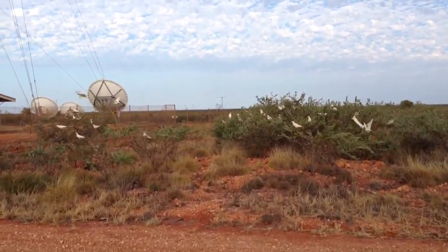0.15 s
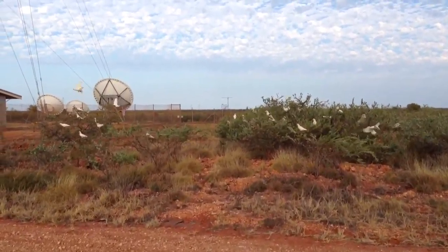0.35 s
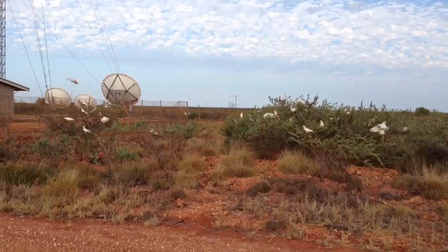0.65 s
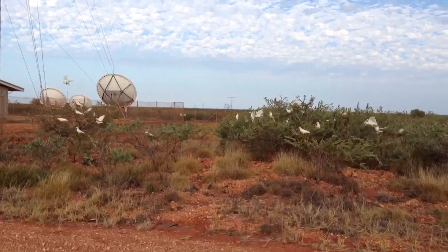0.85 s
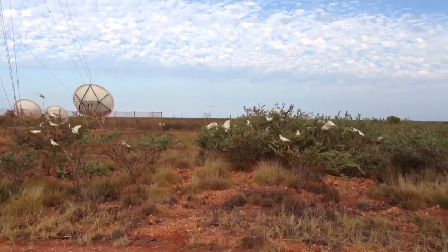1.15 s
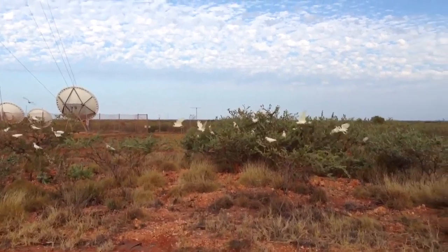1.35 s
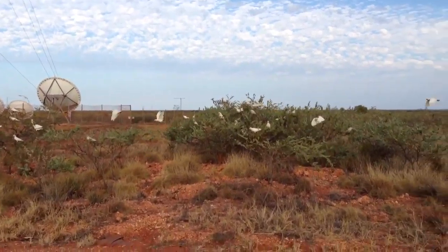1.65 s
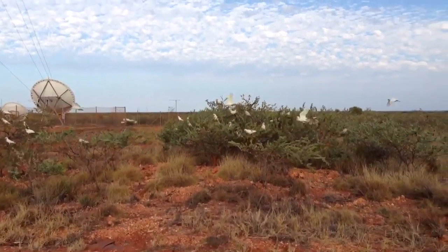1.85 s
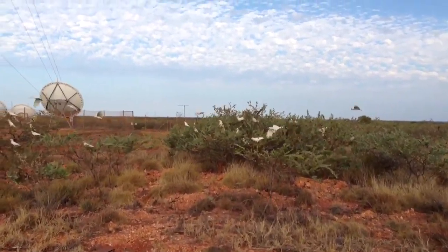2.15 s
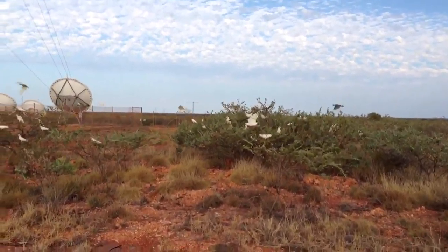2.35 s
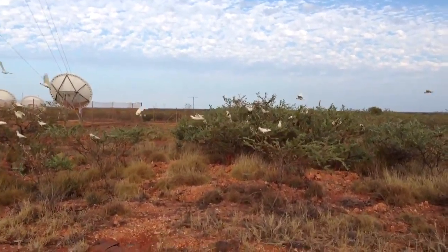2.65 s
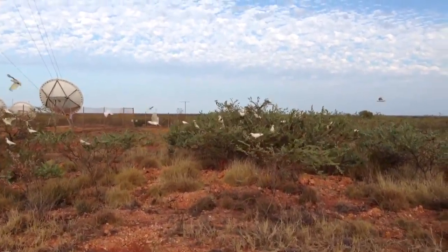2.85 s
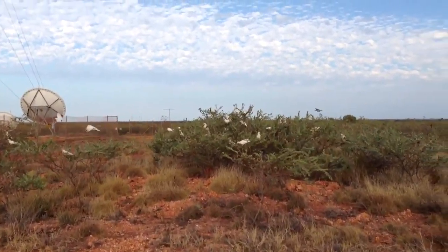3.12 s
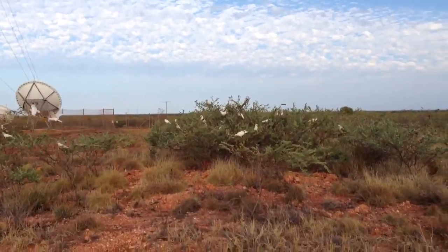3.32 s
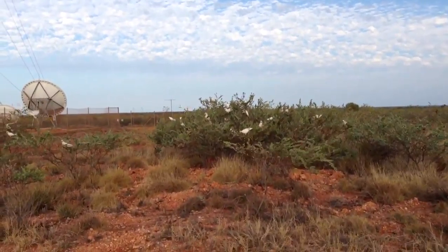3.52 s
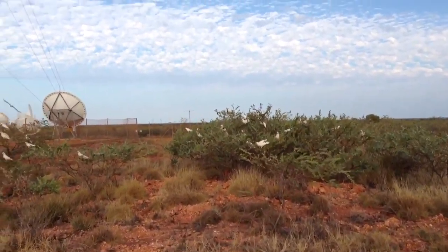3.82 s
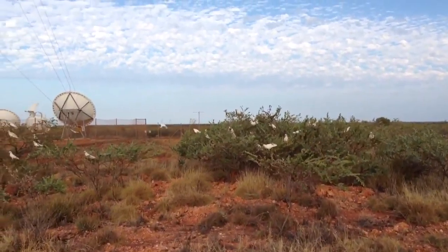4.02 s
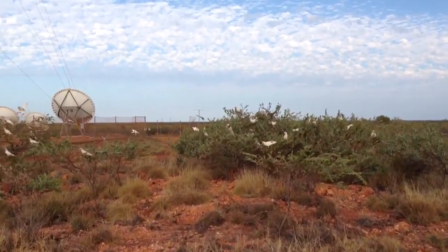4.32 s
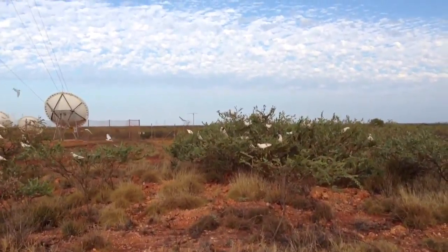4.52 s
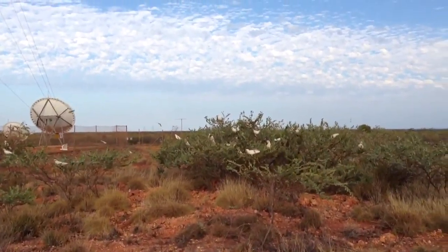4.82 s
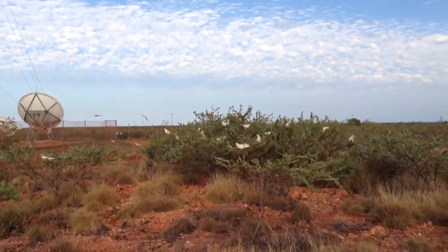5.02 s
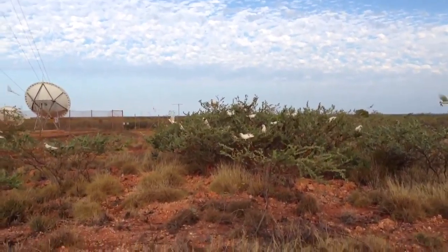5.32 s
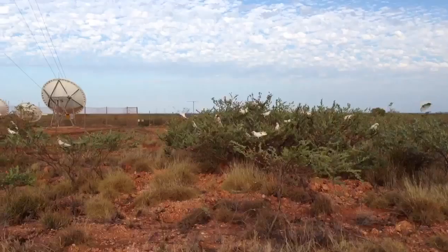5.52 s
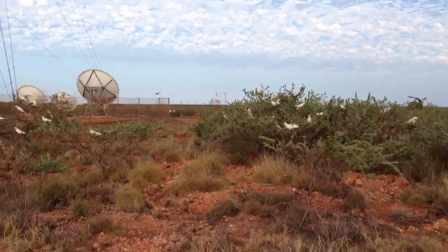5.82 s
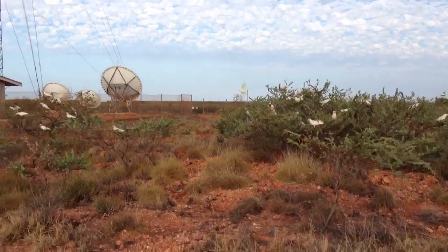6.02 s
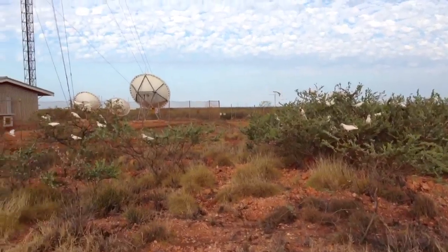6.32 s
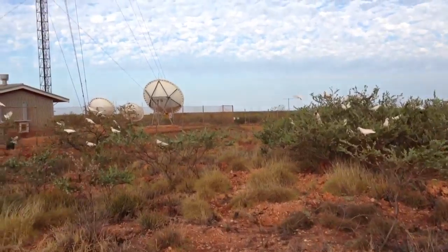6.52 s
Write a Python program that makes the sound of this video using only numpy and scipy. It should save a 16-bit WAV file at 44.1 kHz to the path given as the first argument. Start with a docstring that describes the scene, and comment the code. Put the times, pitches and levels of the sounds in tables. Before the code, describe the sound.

Outdoors in open, bushy scrubland, a flock of large parrots calls at varied distances. A wind bump hits the microphone early, then a strong hoarse squawk comes, followed by fainter calls and a lull. Louder wavering screeches return mid-way, the strongest around four seconds. Small dry ticks and a soft distant roar lie underneath. The end brings heavy low wind thumps with a few weaker calls.

```python
"""Open scrubland: a flock of large white parrots calls near and far, clear wavering screeches of arched notes.
Each call is a stack of harmonics hazed with breath noise; bushes, a building and far objects return it.
A gusty wind buffets the microphone with low noise and short puffs; small dry ticks are snaps of noise.
A distant roar and a deeper drone swell and fade over a faint hiss, all three made of noise bands."""
import sys
import numpy as np
from scipy import signal
from scipy.io import wavfile
from scipy.ndimage import uniform_filter1d, map_coordinates

SR = 44100
rng = np.random.default_rng(int(sys.argv[2]) if len(sys.argv) > 2 else 0)


def output_pcm(signal):
    """Save a mono or channel-first signal as 16-bit PCM at the path in sys.argv[1].

    Samples are clipped to [-1, 1] before scaling.
    """
    pcm = np.clip(np.atleast_2d(signal).T, -1, 1) * 32767
    wavfile.write(sys.argv[1], SR, np.round(pcm).astype(np.int16))


N = 293783   # samples
CUTOFF_HZ = 15850   # top of the microphone's range


def amp(db):
    """Decibels to gain."""
    return 10 ** (np.asarray(db) / 20)


def rms_one(x):
    """Scale to unit rms."""
    return x / np.sqrt(np.mean(x ** 2) + 1e-20)


def filtered(x, order, hz, kind):
    """Butterworth filter."""
    return signal.sosfilt(signal.butter(order, hz, kind, fs=SR, output="sos"), x)


def at_hz(points, hz):
    """Read a (frequency, dB) spectrum on a log-frequency axis."""
    points_hz, points_db = np.transpose(points)
    return np.interp(np.log(hz), np.log(points_hz), points_db)


def in_time(rows):
    """Join (time, value) points by straight lines."""
    return np.interp(np.arange(N) / SR, *np.transpose(rows))


def drift(rate_hz):
    """Slow random signal of unit rms: white noise through a double one-pole low-pass."""
    r = np.exp(-2 * np.pi * rate_hz / SR)
    slow = signal.lfilter([1], [1, -2 * r, r * r], rng.standard_normal(N + SR // 2))
    return rms_one(slow[SR // 2:])   # skip the settling


def patchy_noise(spectrum, patchy_db):
    """Half-octave noise bands, each flickering on its own and with the others; unit rms."""
    out, together, own = 0, drift(7.8), drift(32)
    edges_hz = 200 * 2 ** np.arange(0, 6.6, .5)
    white = rng.standard_normal((2, N))
    for k, (low_hz, high_hz) in enumerate(zip(edges_hz, edges_hz[1:])):
        band = filtered(white[k % 2], 2, [low_hz, high_hz], "band")
        flicker = .8 * together + np.roll(own, k * N // 14)
        band_db = at_hz(spectrum, np.sqrt(low_hz * high_hz))
        out = out + band * amp(band_db + patchy_db * flicker)
    return rms_one(filtered(out, 3, 180, "high"))


def hiss():
    """Faint, nearly steady broadband noise."""
    # relative spectrum: (frequency [Hz], density [dB per Hz])
    spectrum = [(300, -40), (2000, 1), (5000, -2), (9000, -5.5), (15000, -8)]
    return amp(-63) * patchy_noise(spectrum, patchy_db=.1)


def drone():
    """Deeper noise, strongest at 480-620 Hz, swelling and fading."""
    # relative spectrum: (frequency [Hz], density [dB per Hz])
    spectrum = [(300, -20), (480, 0), (620, 0), (900, -25), (15000, -99)]
    # drone strength: (time [s], level [dB])
    level = [(0, -62), (.55, -53.5), (.75, -60), (1.04, -46.5), (1.26, -60), (1.61, -56), (2.5, -63.5),
             (2.8, -95), (3.4, -72), (3.85, -55.5), (4.5, -63.5), (4.85, -59.5), (5.8, -67.5), (6.1, -69.5),
             (6.66, -48)]
    return amp(in_time(level)) * patchy_noise(spectrum, patchy_db=.8)


def roar():
    """Distant noise, strongest near 1 kHz, swelling and fading."""
    # relative spectrum: (frequency [Hz], density [dB per Hz])
    spectrum = [(180, -33), (300, -27), (473, 4), (840, 5.5), (1050, 16.5), (1430, 3), (1540, 8.5),
                (2620, -26.5), (4000, -13), (5200, -76), (8800, -120)]
    # roar strength: (time [s], level [dB])
    swell = [(0, -51), (.45, -54.5), (1.1, -47.5), (1.3, -48.5), (1.61, -54.5), (2.09, -57.5), (2.5, -55),
             (2.76, -51.5), (3.41, -52.5), (3.84, -59), (4.51, -54), (5, -62.5), (5.3, -57), (5.64, -52.5),
             (6.08, -59.5), (6.66, -56)]
    return amp(in_time(swell)) * patchy_noise(spectrum, patchy_db=.8)


def wind():
    """Lumpy low turbulence, and eddies that hit the microphone port as short puffs."""
    # gust strength: (time [s], level [dB])
    gust = [(0, -60.5), (.3, -63.5), (.4, -30.5), (.54, -45.5), (.62, -59.5), (.95, -61.5), (1.1, -52),
            (1.25, -62.5), (2.1, -65), (2.56, -63), (2.8, -65.5), (3.9, -61), (4.2, -53.5), (5.25, -55.5),
            (5.64, -66), (6.08, -40), (6.25, -49.5), (6.45, -26), (6.57, -40), (6.66, -41)]
    # strong puffs: (time [s], body level [dB], length [ms], edge level re body [dB])
    strong = [(0.183, -33, 25, -14), (.215, -34.5, 22, -25), (.237, -38, 7.8, -29), (0.283, -39.5, 22, -25),
              (0.405, -23, 13, -15.5), (.424, -22.5, 10.6, -13), (0.453, -27, 11.7, 1),
              (0.476, -24.5, 10, 3.5), (.487, -23, 14.5, -9.5), (.512, -22.5, 12.4, -14),
              (.53, -29, 9.9, -5), (0.976, -22.5, 22, -7.5), (1.03, -26.5, 11, -30),
              (1.093, -36.5, 13, -19), (1.148, -50, 24, -25), (2.5, -50, 35, -17), (2.66, -50.5, 24, -18),
              (4.092, -40, 27, -29), (4.218, -27.5, 10, -9.5), (4.417, -28.5, 17, -11),
              (4.66, -38.5, 4, -25), (4.762, -36, 13, -11), (4.831, -43, 17, -18), (4.869, -39.5, 18, -18),
              (4.94, -36, 21, -33), (5.066, -41, 7, -15), (5.143, -45, 12, -20), (5.294, -38.5, 14, -14.5),
              (5.337, -44.5, 11, -17), (5.971, -30.5, 9.1, -22), (5.988, -35.5, 6.4, 1),
              (6.048, -32, 10, -22), (6.069, -29.5, 7.4, -5), (6.088, -29.5, 17, -11),
              (6.129, -25.5, 7.7, -17.5), (6.147, -40.5, 12, 1), (6.263, -44, 20, -14),
              (6.303, -34, 18, -17), (6.341, -18, 6.6, -26), (6.394, -27, 9.4, -18), (6.409, -13.5, 3.8, 4),
              (6.427, -14.5, 7.5, 3), (6.435, -12.5, 10.2, 4.5), (6.45, -9, 3.5, -7), (6.476, -27, 31, -4),
              (6.535, -21.5, 16, -20), (6.575, -20, 14, -10.5), (6.597, -22.5, 9.8, -34),
              (6.613, -20, 7.1, -7.5), (6.63, -25, 6.6, -23)]
    body_hz, edge_hz = 198.7, 501
    octaves_per_db, reference_db = .01, -32.5   # harder puffs sit a little higher
    small_count, small_over_gust_db, small_ms, small_edge_db = 70, .5, 15.4, -35

    gust_db = in_time(gust)
    lumpy = filtered(rng.standard_normal(N), 2, [130, 290], "band")
    deep = filtered(rng.standard_normal(N), 2, 110, "low")
    lumps_db = 5.2 * drift(19.7)
    rumble = rms_one(deep) * amp(gust_db - 1.5 + lumps_db)
    turbulence = rms_one(lumpy) * amp(gust_db + lumps_db)
    out = np.r_[turbulence + rumble, np.zeros(SR)]

    small = []   # scattered by chance, riding the gust
    for when, size, long in rng.random((small_count, 3)):
        level_db = gust_db[int(when * N)] + small_over_gust_db - 10 * size
        small.append((.05 + when * (N / SR - .05), level_db, small_ms * (.5 + long), small_edge_db))

    t = np.arange(-2000, 3000) / SR
    for s, level_db, length_ms, edge_db in strong + small:
        # bell with length_ms between half-height points, centred 2 ms early
        window = 2 ** -(2 * (t + .002) * 1000 / length_ms) ** 2
        burst = window * rng.standard_normal(5000)
        i = round(s * SR) - 2000
        raised_hz = body_hz * 2 ** (octaves_per_db * (level_db - reference_db))
        for hz, db in ((raised_hz, level_db), (edge_hz, level_db + edge_db)):
            puff = filtered(burst, 2, [.65 * hz, 1.31 * hz], "band")
            puff = filtered(puff, 2, 1.6 * hz, "low")
            out[i:i + 5000] += amp(db) * puff * np.sqrt(np.sum(window ** 2) / np.sum(puff ** 2))
    return out[:N]


def ticks():
    """Millisecond snaps of noise, coloured by a broad resonance."""
    # dry ticks: (time [s], peak [dB], centre [Hz])
    snaps = [(0.1663, -45, 3900), (0.3208, -36.5, 6170), (0.6983, -44.5, 6350), (1.4272, -29, 6790),
             (1.8068, -45.5, 3940), (2.1298, -40, 6900), (2.1914, -35.5, 4760), (2.5674, -47, 4600),
             (2.798, -51, 3690), (3.715, -41.5, 3860), (5.6013, -41, 4200), (6.317, -41.5, 6400),
             (6.3634, -43.5, 5790), (6.4464, -40, 3510)]
    out, t = np.zeros(N), np.arange(400) / SR
    for s, peak_db, hz in snaps:
        envelope = amp(-60 * t / .008) * np.minimum(t / .0004, 1)   # 8 ms T60, 0.4 ms attack
        snap = rng.standard_normal(400) * envelope
        tone = filtered(snap, 1, [.65 * hz, 1.4 * hz], "band")
        snap = filtered(tone + .3 * snap, 2, 8500, "low")
        i = round(s * SR)
        out[i:i + 400] += amp(peak_db) * snap / np.abs(snap).max()
    return out


def scrubland(x):
    """Scatter from bushes close by, an echo off a building and a long faint smear from far objects."""
    scrub_t60_s, scrub_db = .19, -12
    far_t60_s, far_db = 1, -38.5
    wall_s, wall_db = .047, -36
    t = np.arange(SR) / SR
    near = rng.standard_normal(SR) * amp(-60 * t / scrub_t60_s)
    far = rng.standard_normal(SR) * amp(-60 * t / far_t60_s)
    far = filtered(far, 1, [1800, 3500], "band")
    tail = (amp(scrub_db) * rms_one(near) + amp(far_db) * rms_one(far)) / np.sqrt(SR)
    # the wall returns a slightly smeared copy
    smear = rms_one(near[:130]) / np.sqrt(130)
    wall = np.r_[np.zeros(round(wall_s * SR)), amp(wall_db) * smear]
    return signal.fftconvolve(x, tail)[:N] + signal.fftconvolve(x, wall)[:N]


def parrots():
    """Each call is a stack of harmonics on one running phase, read through that call's colour."""
    # one table per call, turning points of its song: (time [s], pitch [Hz], level [dB])
    songs = [
        [(0, 880, -56), (.05, 800, -58), (.09, 870, -54), (.128, 780, -56), (.155, 860, -57), (.205, 870, -61)],
        [(.84, 518, -59.5), (.885, 594, -32.5), (.912, 670, -31.5), (.928, 662, -31.5), (.944, 610, -27.5),
         (.962, 647, -26), (.976, 749, -26.5), (.994, 761, -23.5), (1.013, 745.5, -27), (1.036, 550.6, -33),
         (1.056, 570, -30), (1.073, 658, -27), (1.08, 724, -29.5), (1.108, 720, -28), (1.14, 527, -47)],
        [(1.015, 745, -46), (1.05, 740, -56), (1.09, 735, -56), (1.135, 730, -45), (1.152, 705, -44),
         (1.18, 755, -51), (1.21, 729, -60), (1.25, 744, -60)],
        [(1.26, 754, -56), (1.28, 737, -49), (1.3, 740, -59)],
        [(1.35, 775, -53), (1.366, 808, -54), (1.383, 840, -52.5)],
        [(1.385, 771, -44.5), (1.445, 776, -42)],
        [(1.495, 694, -50), (1.53, 790, -47), (1.565, 775, -53)],
        [(2.592, 1083, -49), (2.63, 1158, -37), (2.67, 1218, -40.5), (2.692, 1230, -46), (2.715, 1020, -46)],
        [(2.738, 1140, -53), (2.755, 1197, -60), (2.772, 1320, -50)],
        [(2.773, 780, -40), (2.793, 776, -46), (2.812, 735, -43)],
        [(3.02, 933, -45.5), (3.05, 902.5, -34), (3.075, 861, -28.5), (3.106, 961, -20.5), (3.127, 885, -24),
         (3.146, 800, -26.5), (3.17, 830, -32), (3.192, 859, -28), (3.217, 993, -26), (3.237, 920, -24),
         (3.26, 710, -41)],
        [(3.35, 699, -54), (3.385, 759, -47), (3.42, 796, -39.5), (3.438, 769, -32), (3.455, 794, -31.5),
         (3.5, 821, -33.5), (3.545, 837, -36), (3.575, 832, -41), (3.585, 830, -45), (3.589, 940, -45.5),
         (3.604, 950, -46)],
        [(3.605, 760, -59), (3.65, 808, -63.5), (3.7, 828, -62)],
        [(3.75, 653, -56), (3.79, 626, -55.5), (3.83, 703, -50.5), (3.86, 681, -47.5), (3.893, 697, -49.5)],
        [(3.894, 695, -43), (3.91, 799, -38), (3.925, 841, -35), (3.933, 743, -33), (3.939, 688, -25),
         (3.955, 704, -25.5), (3.968, 765, -24.5), (3.975, 692, -24), (3.987, 661, -27), (4.005, 687, -21),
         (4.028, 783, -21), (4.05, 872, -17.5), (4.066, 828, -20.5), (4.077, 746, -22.5), (4.092, 576, -37)],
        [(4.328, 609, -58), (4.36, 645, -37.5), (4.392, 699, -36), (4.41, 709, -36.5), (4.426, 678, -30),
         (4.433, 655, -29.5), (4.439, 754, -29.5), (4.452, 766, -28.5), (4.464, 731, -31.5),
         (4.483, 580, -33.5), (4.5, 599, -32), (4.515, 669, -29), (4.527, 755, -31.5), (4.54, 764, -29.5),
         (4.553, 711, -29), (4.57, 574, -42)],
        [(5.045, 711, -46.5), (5.097, 745, -39.5), (5.15, 756, -39.5), (5.2, 755, -44), (5.252, 750, -46),
         (5.257, 802, -44), (5.28, 808, -44), (5.305, 756, -55)],
        [(6.26, 677, -60), (6.325, 727, -64), (6.39, 740, -63.5)],
        [(6.395, 662, -47), (6.43, 697, -46), (6.466, 682, -37), (6.474, 765, -40), (6.489, 792, -39),
         (6.508, 750, -41.5), (6.53, 790, -52)],
        [(6.545, 795, -50), (6.572, 845, -50), (6.598, 783, -37.5), (6.604, 860, -36), (6.622, 931, -35),
         (6.64, 903, -37), (6.66, 780, -39.5)],
    ]
    # one table per call, colour from throat, beak and ground echo: (frequency [Hz], gain [dB])
    voices = [
        [(800, -27), (1700, -26), (2550, -5.5), (3500, -19), (4500, -19), (15000, -54)],
        [(520.0, -23), (1150.0, -6), (1350.0, -29), (1550.0, -10.5), (1900, -7), (2150, -7), (2300, -12),
         (2600.0, -2.5), (2800.0, -13), (3500.0, 0.5), (3850.0, -8), (5000.0, -14), (5250.0, -24.5),
         (6700.0, -20.5), (6950.0, -26.5), (12000.0, -47.5), (15000.0, -56)],
        [(710.0, -23), (1600.0, -15), (2350.0, 6), (2950.0, -29), (5380.0, -30), (15000.0, -53.0)],
        [(720.0, -25), (2250.0, -2), (2800.0, -1), (3000.0, -26), (5130.0, -47), (15000.0, -60)],
        [(780.0, -25), (2300.0, -16), (2500.0, 6.5), (3350.0, -13), (5500.0, -17), (15000.0, -59)],
        [(770.0, -14), (1500.0, 3), (2300.0, -34), (3150.0, -20), (5430.0, -31.4), (15000.0, -61.0)],
        [(700.0, -27), (1600.0, -1.5), (2450.0, -27), (3150.0, -16), (5490.0, -36), (15000.0, -63.0)],
        [(1030.0, 1), (1200.0, -19), (2500.0, -13), (3400.0, -19), (5490.0, -21.5), (15000.0, -92)],
        [(1150.0, -23), (2450.0, 2), (3500.0, -8), (4550.0, 3.5), (5230.0, -21), (15000.0, -44.0)],
        [(750.0, -31), (1550.0, -2.5), (2400.0, -28.9), (3050.0, -15.5), (5490.0, -36), (15000.0, -62.0)],
        [(720.0, -11), (1000.0, -37.5), (1700, -31), (1900, -10), (2300.0, -11), (2500.0, -4), (2800.0, -6),
         (3000.0, -26), (3200.0, -8), (3500.0, -23), (3850.0, -5), (4200.0, -19), (4750, -17.5), (5100, -22),
         (5400, -20), (5800, -31), (6550.0, -25), (12000.0, -55), (15000.0, -70.0)],
        [(700.0, -8.5), (900.0, -13), (2050.0, -12), (3250.0, -14), (3900.0, -3.4), (4750.0, -19), (5000.0, -6),
         (5250.0, -33), (5700.0, -11.5), (11990.0, -42), (15000.0, -54)],
        [(800.0, -25), (2400.0, 8.5), (2600.0, -8), (4100.0, 0), (5120.0, -4), (15000.0, -35)],
        [(630.0, -0.5), (2100.0, -2.5), (2600.0, -14), (3100.0, -7), (4550.0, -3.5), (6000.0, -19),
         (7970.0, -21), (15000.0, -74)],
        [(650.0, -10.5), (900.0, -17.5), (1300.0, -3.5), (1500.0, -6.5), (1700.0, -5), (1900.0, -16),
         (2500.0, 0), (2700.0, -5.5), (3350.0, -8), (3550.0, -3), (3800.0, -6), (7200.0, -19), (11970.0, -42.5),
         (15000.0, -44)],
        [(570.0, -33), (1150.0, -4.5), (1550.0, -10), (1750.0, -26), (2100.0, -1), (2900.0, -13), (3100.0, -13),
         (3350.0, -2), (3650.0, -17.5), (4600.0, -7), (4900.0, -14), (5400.0, -9), (11990.0, -47),
         (15000.0, -62)],
        [(710.0, -19.5), (1500.0, -10.5), (2100.0, 2), (2300.0, -28), (2950.0, -8.5), (3150.0, -18),
         (5400.0, -14.5), (7990.0, -33), (15000.0, -64)],
        [(690.0, -33), (1450.0, -17), (2100.0, -0.5), (2950.0, 1), (3600, -7), (5160.0, -26), (15000.0, -41)],
        [(670, -40), (1400, -11), (1600, -13), (2050, -11), (2400, 3), (2750, -13), (3400, -20), (5000, -29),
         (15000, -61)],
        [(760.0, -29), (1000.0, -25), (1700.0, 0), (1900.0, -1), (2400.0, -7.5), (4150.0, -11), (5900.0, -28),
         (7990.0, -37), (15000.0, -64.0)],
    ]
    # relative hoarseness, one per call: (level [dB])
    rasps = [-2, -12, -17, -17, -22, -22, -22, -22, -22, -22, -19, -34, -22, -22, -14, -15, -32, -16, -13,
             -13]
    rasp_offset_db = 5.5
    break_s, break_db_per_hz = .02, .055   # voice cracks hoarse as a call drops away at its end
    soft_dulling = .22   # dB per octave lost for each dB below full effort
    jitter, flutter_db = .003, 2.3   # pitch spread as a fraction; base level waver

    out = np.zeros(N)
    flutter, breath, wobble = drift(35), drift(153), drift(210)
    starts_rad = rng.uniform(0, 2 * np.pi, 20)
    for song, hoarse_db, voice in zip(songs, rasps, voices):
        s, hz, db = np.transpose(song)
        first, last = int(s[0] * SR), min(int(s[-1] * SR), N)
        t = np.arange(first, last) / SR

        final_drop_hz = max(hz[-2] - hz[-1], 0)
        breaking = np.clip(1 - (s[-1] - t) / break_s, 0, 1)
        rasp_db = hoarse_db + break_db_per_hz * final_drop_hz * breaking

        point_index = np.interp(t, s, np.arange(len(s)))
        arches_hz = map_coordinates(hz, [point_index], order=2, mode="nearest")
        # muscles need a few milliseconds to jump between notes
        pitch_hz = uniform_filter1d(arches_hz, size=130) * (1 + jitter * wobble[first:last])
        phase = 2 * np.pi * np.cumsum(pitch_hz) / SR

        fades = np.clip(np.minimum(t - t[0], t[-1] - t) / .004, 0, 1)
        level_db = uniform_filter1d(np.interp(t, s, db), size=110)
        level = fades * amp(level_db)
        slack_db = level_db.max() - level_db
        waver_db = flutter_db + np.minimum(9 * amp(rasp_db), 2.5)   # hoarse calls waver more

        for k in range(1, 21):
            own = np.arange(first, last) - k * N // 21   # each harmonic wavers in its own way
            harmonic_hz = k * pitch_hz
            dulling_db = soft_dulling * slack_db * np.log2(np.maximum(harmonic_hz / 2500, 1))
            gain = amp(at_hz(voice, harmonic_hz) - dulling_db + waver_db * flutter[own])
            gain = gain * (harmonic_hz < CUTOFF_HZ)
            # turbulent breath spreads noise around each harmonic, more around the high ones
            haze = amp(rasp_db + rasp_offset_db) * np.sqrt(k / 4) * breath[own] * np.cos(k * phase)
            out[first:last] += level * gain * (np.sin(k * phase + starts_rad[k - 1]) + haze)
    return out


def scene():
    """Hiss, drone, roar and wind behind the ticks and parrots, which the scrubland scatters."""
    near = ticks() + parrots()
    return (hiss() + drone() + roar() + wind() + scrubland(near) + near)[None]


def record(dry):
    """The microphone cuts the bass, steeply at first then gently, rounds peaks and cuts the top steeply."""
    low_cut_hz, ceiling = 104, .7
    bass_leak = amp(-24.5) * filtered(dry, 2, 45, "high")
    thin = filtered(dry, 4, low_cut_hz, "high") + bass_leak
    rounded = ceiling * np.tanh(thin / ceiling)
    return signal.sosfilt(signal.cheby2(18, 70, CUTOFF_HZ, fs=SR, output="sos"), rounded)


dry = scene()
out = record(dry)
output_pcm(out)
```